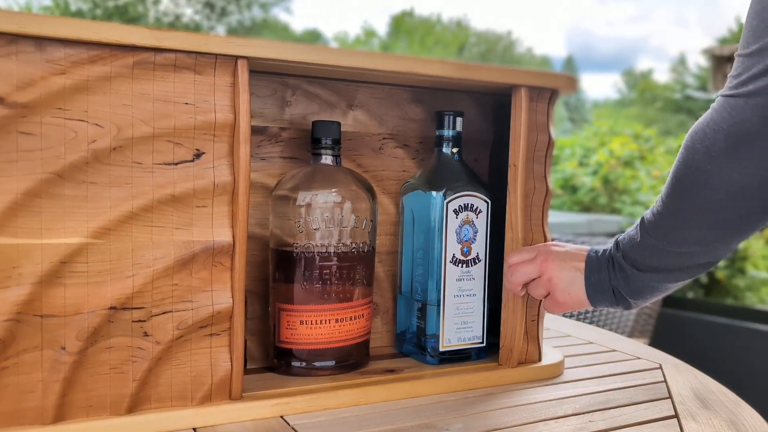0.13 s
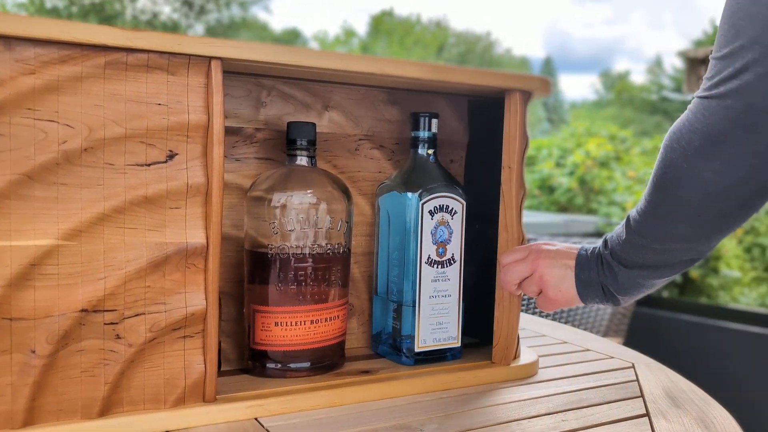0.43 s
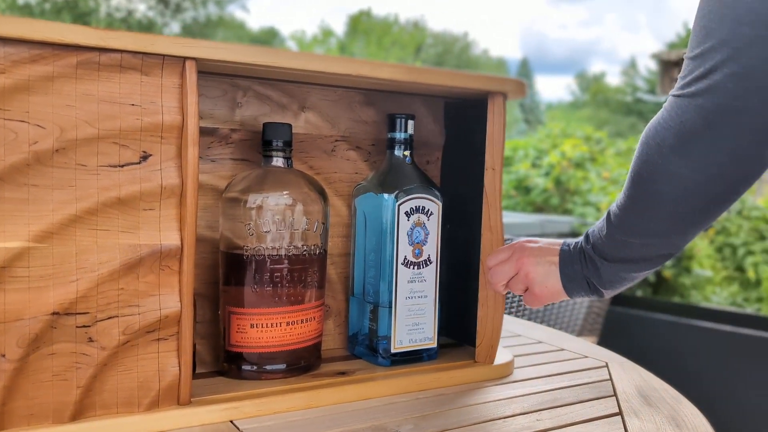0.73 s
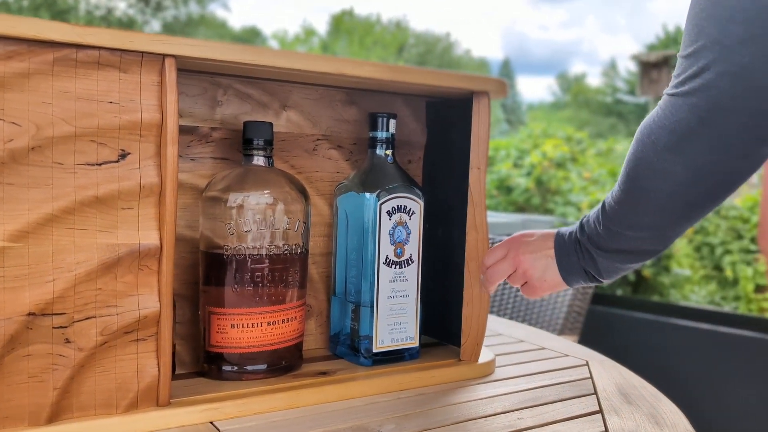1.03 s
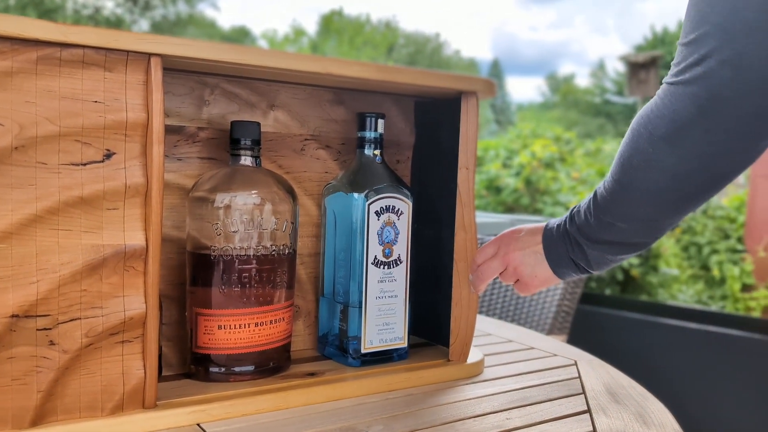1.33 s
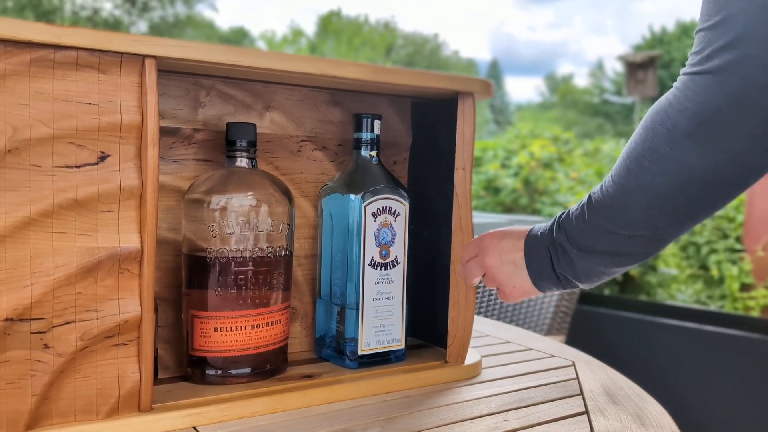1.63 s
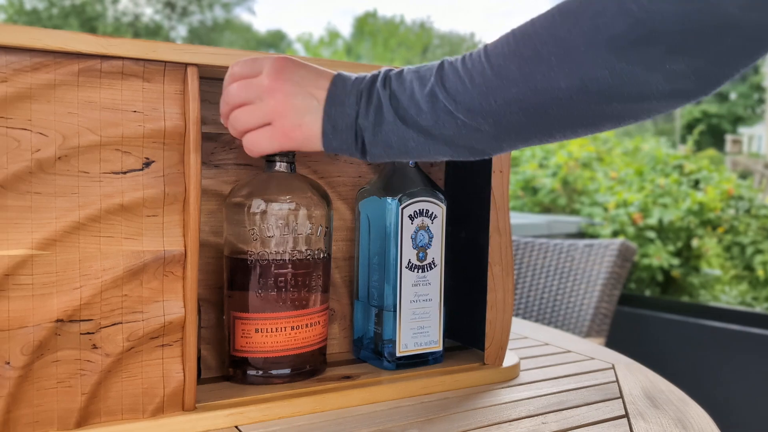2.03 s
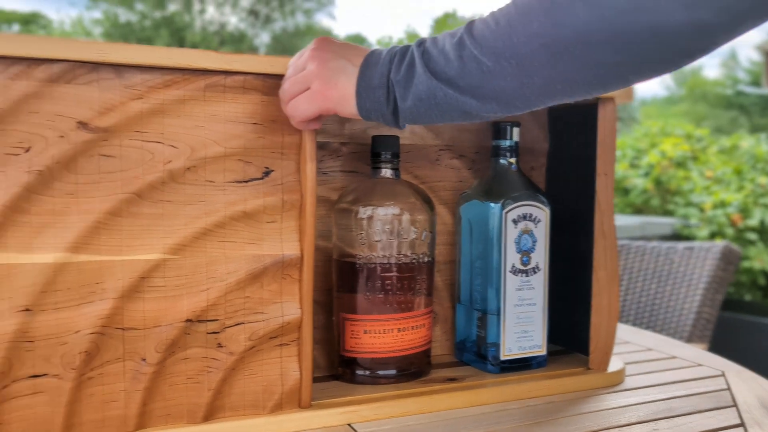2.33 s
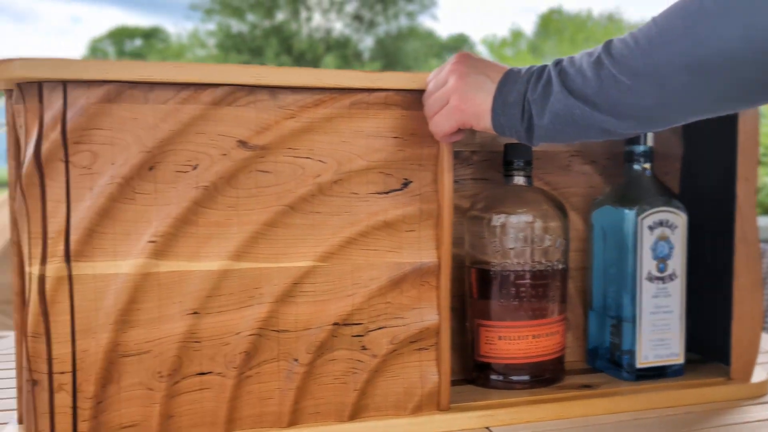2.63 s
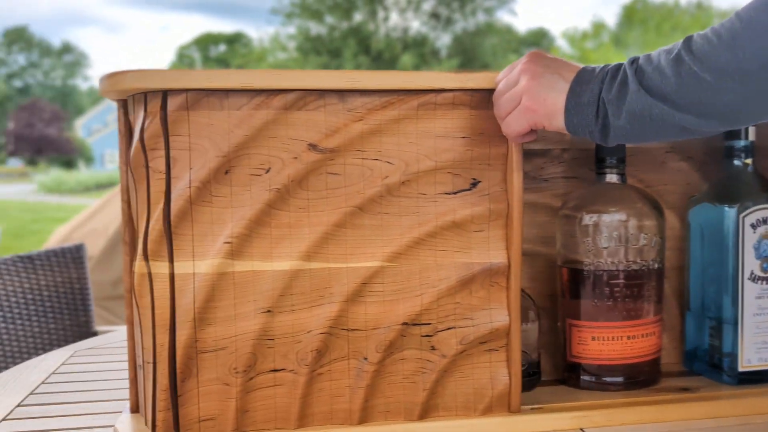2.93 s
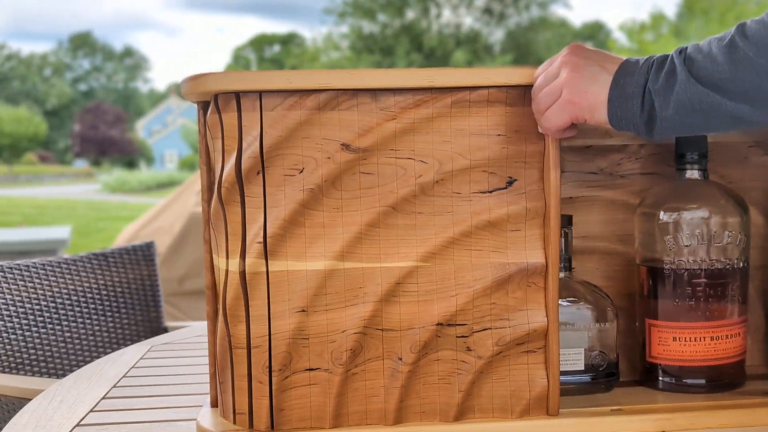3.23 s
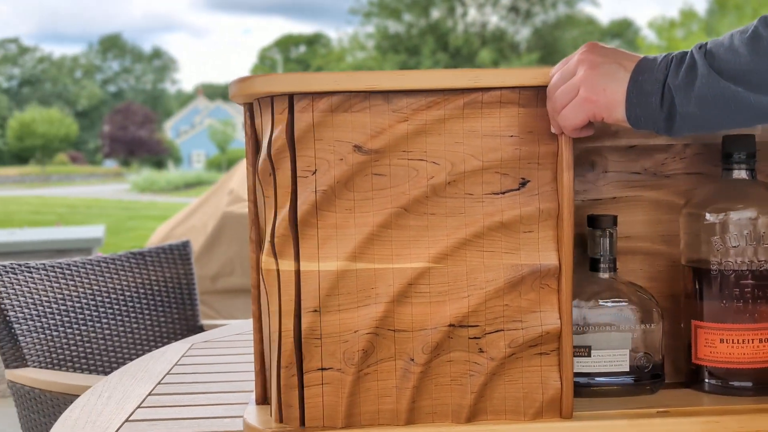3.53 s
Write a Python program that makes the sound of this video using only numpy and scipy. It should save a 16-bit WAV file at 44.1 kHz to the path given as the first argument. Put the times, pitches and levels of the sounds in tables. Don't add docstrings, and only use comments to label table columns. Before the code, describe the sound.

A slatted wooden door slides close by from 0 to 0.6 s, with low hollow rumble, dry rubbing and small knocks, then a short shove until about 1.1 s. A quiet gap holds faint scuffs, distant bird whistles and a pulsing trill over soft air and traffic hum. From 2.8 s a second slide rolls louder, with deep woody thuds and quick clatter, still moving at the 3.7 s end.

```python
import sys
import numpy as np
from scipy import signal
from scipy.fft import rfft, irfft, next_fast_len
from scipy.io import wavfile
from scipy.ndimage import uniform_filter1d, map_coordinates

SR = 44100
rng = np.random.default_rng(int(sys.argv[2]) if len(sys.argv) > 2 else 0)


def invert_db(level):
    return 10 ** (np.asarray(level, dtype=float) / 20)


def inscribe(sig):
    pcm = np.round(np.clip(np.atleast_2d(sig).T, -1, 1) * 32767)
    wavfile.write(sys.argv[1], SR, pcm.astype(np.int16))


N = 161847


def unit(x):
    return x / np.sqrt(np.mean(x ** 2))


def shape(x, points):
    p, size = np.array(points), next_fast_len(N + SR)
    log_hz = np.log(np.fft.rfftfreq(size, 1 / SR) + 1)
    gain = invert_db(np.interp(log_hz, np.log(np.maximum(p[:, 0], 1)), p[:, 1]))
    return irfft(rfft(x, size) * gain, size)[..., :N]


def band(x, hz, width_hz):
    return signal.lfilter(*signal.iirpeak(hz, hz / width_hz, SR), x)


def low_cut(x, order, hz):
    return signal.sosfilt(signal.butter(order, hz, "high", fs=SR, output="sos"), x)


def ring(x, modes):
    out = 0
    for hz, db, t60_s in modes:
        pole = np.exp(2j * np.pi * hz / SR - np.log(1000) / (t60_s * SR))
        out = out + invert_db(db) * signal.lfilter([1], [1, -pole], x).imag
    return out


def walk(rate_hz):
    k = int(SR / rate_hz)
    steps = np.repeat(rng.standard_normal(N // k + 1), k)
    return 1.1 * uniform_filter1d(uniform_filter1d(steps, k), k)[:N]


def clicks(rate_hz, spread_db):
    chance, side, size = rng.random((3, N))
    return (chance < rate_hz / SR) * np.sign(side - .5) * invert_db(-spread_db * np.log(1 - size))


def ports(x, lag):
    left = map_coordinates(x, [np.arange(N) - lag], order=1, mode="mirror")
    return np.array([left, x])


def echoes(x, wet_db, t60_s):
    t = np.arange(int(t60_s * SR)) / SR
    tail = rng.standard_normal((2, SR))[:, :len(t)] * invert_db(-60 * t / t60_s)
    tail = tail / np.sqrt((tail ** 2).sum(axis=1, keepdims=True))
    return invert_db(wet_db) * signal.fftconvolve(x[None], tail, axes=1)[:, :N]


# time_s, cabinet_load_db, rub_level_db (faster sliding rubs louder)
HAND_PUSHES = [
    [(0, -40.5, -64.5), (.03, -43.5, -71.5), (.1, -46.5, -71.5), (.16, -46.5, -71.5), (.32, -52, -72.5),
     (.41, -48.5, -69), (.5, -55, -73.5), (.55, -58, -79.5), (.6, -75, -102)],
    [(.62, -46, -96), (.7, -58.5, -79.5), (.785, -61, -80), (.8, -54.5, -75), (.86, -52, -73.5),
     (.9, -47, -71.5), (.913, -45, -80), (.95, -56.5, -83), (1.1, -80, -99)],
    [(2.79, -60.5, -84), (2.825, -46.5, -80.5), (2.9, -48, -75.5), (3.0, -39.5, -72), (3.08, -45.5, -74.5),
     (3.17, -37, -71.5), (3.31, -40.5, -70), (3.38, -41.5, -74.5)],
    [(3.38, -42, -71), (3.44, -35, -70), (3.46, -41.5, -72), (3.5, -34, -67.5), (3.53, -31, -72.5),
     (3.57, -47.5, -79), (3.61, -36.5, -74), (3.65, -36, -64.5), (3.67, -35, -64)],
]


def effort(column):
    t, gains = np.arange(N) / SR, []
    for push in HAND_PUSHES:
        p = np.array(push)
        gains.append(invert_db(np.interp(t, p[:, 0], p[:, column], left=-150, right=-150)))
    return np.max(gains, axis=0)


def rumble(on, body, level_db):
    jolts = signal.lfilter(*signal.butter(1, 600, fs=SR), clicks(500, 1.3)) * invert_db(2.22 * walk(25.04))
    return ring(jolts * effort(column=1) * on, body) * invert_db(level_db) / np.std(ring(jolts, body))


def rub(on, track, colour, level_db, squeak_db):
    grit = unit(clicks(2500, 2.2)) * .5 + rng.standard_normal((2, N))
    grit = grit * invert_db(1.5 * walk(14))
    squeak = sum(invert_db(db + 4 * walk(13)) * band(grit, hz, width_hz) for hz, width_hz, db in track)
    hiss = unit(shape(grit, colour)) + invert_db(squeak_db) * unit(squeak)
    speed = effort(column=2)
    sheen = signal.sosfiltfilt(signal.butter(2, 6550, "high", fs=SR, output="sos"), hiss)
    brisk_db, sheen_power = -73.5, 0.94
    hiss = hiss - sheen * (1 - np.minimum(speed / invert_db(brisk_db), 1) ** sheen_power)
    return hiss * speed * on * invert_db(level_db)


# time_s, peak_db, low_thud_db, sharp_tick_db
SLAT_KNOCKS = [(0.079, -52, 22.5, -17.5), (0.189, -48, 8, -8), (0.326, -44, -6, -7),
               (0.368, -47.5, 16, 0.5), (0.601, -45, 3, -20), (0.654, -49, -16, 0),
               (0.908, -40.5, -17, -13.5), (0.964, -55, -10.5, -5.5), (1.015, -51, -19, -29),
               (2.824, -57, 12, 1), (2.896, -42.5, 1, -7), (2.983, -44, -7, -9), (3.223, -28.5, -0.5, -21),
               (3.313, -43, -16, -16), (3.405, -47, 2, -14), (3.434, -39.5, -6, -3),
               (3.502, -34.5, -1, -7.5), (3.598, -45, 5, -4), (3.649, -39, -2, -1)]


def knocks(on, body):
    hit, thud, tick = np.zeros((3, N + 2000))
    t = np.arange(900) / SR
    contact_s, thump_s = .003, .0016
    push = t / contact_s * np.exp(1 - t / contact_s)
    thump = t / thump_s * np.exp(1 - t / thump_s) / 150
    snap = np.minimum(t / 0.00116, 1) * np.exp(-t / 0.0023) * (1 - t / t[-1])
    for s, db, low_db, tick_db in SLAT_KNOCKS:
        noise = rng.standard_normal(900)
        i = int(s * SR)
        hit[i:i + 900] += on[i] * invert_db(db - 5) * unit(noise * push) / 40
        thud[i:i + 900] += on[i] * invert_db(db + low_db + 4) * thump
        tick[i:i + 900] += on[i] * invert_db(db + tick_db - 4.5) * 0.88 * noise[::-1] * snap
    upper = [(hz * 1.01, db - body[5][1], 1.16 * t60_s) for hz, db, t60_s in body if hz > 300]
    lower = [(hz, db, 0.85 * t60_s) for hz, db, t60_s in body if hz < 300]
    crack = band(band(tick[:N], 1835, 2460), 1800, 4600)
    return ring(hit[:N], upper) + ring(thud[:N], lower), crack


def door(on, body, track, colour, rumble_db, rub_db, squeak_db):
    woody, crack = knocks(on, body)
    wood = low_cut(rumble(on, body, rumble_db) + woody, 2, 85)
    close = ports(wood + crack, lag=-5.5) + echoes(crack, 20.9, 0.053)
    return close + rub(on, track, colour, rub_db, squeak_db)


# pitch_hz, level_db, t60_s
FIRST_CABINET = [(115.4, -10.5, 0.19), (169, -6.5, 0.088), (227.6, 1, 0.087), (358, -2, 0.028),
                 (425, -3.5, 0.038), (534, -4, 0.0332), (604, -8, 0.053), (773, -5.5, 0.036),
                 (944, -5.5, 0.02), (1154, 0.5, 0.0098)]
SECOND_CABINET = [(96, -38.5, 0.087), (141.8, -2.5, 0.172), (211, 1, 0.059), (235, 0, 0.11),
                  (400, -15, 0.0922), (499, -7, 0.047), (542, -9, 0.088), (760.3, -15, 0.05),
                  (850, -19, 0.047), (966, -9.5, 0.017), (1368, -11.5, 0.011)]
# pitch_hz, width_hz, level_db
FIRST_TRACK = [(1690, 95, 4), (1950, 120, 1), (2250, 140, 0), (3130, 120, -4), (3320, 130, -4),
               (3600, 200, -10), (11800, 2000, -22)]
SECOND_TRACK = [(1710, 480, 11.5), (3500, 1340, -13), (11180, 1300, -7.5)]
# pitch_hz, level_db (per Hz)
FIRST_RUB = [(410, -29), (700, -8), (766, -4), (1470, -22.5), (3230, -10.5), (3970, -15.5), (12000, -23.5),
             (15500, -65.5)]
SECOND_RUB = [(410, -36), (700, -5), (797, -5.5), (1180, -7.5), (1630, -13), (2770, -19), (5640, -18.5),
              (15500, -43.5)]


def both_doors():
    second = np.arange(N) / SR > 2
    one = door(~second, FIRST_CABINET, FIRST_TRACK, FIRST_RUB, rumble_db=-0.71, rub_db=10.14, squeak_db=2.5)
    two = door(second, SECOND_CABINET, SECOND_TRACK, SECOND_RUB, rumble_db=-.7, rub_db=16.0, squeak_db=-11.5)
    return one + two


# start_s, pitch_hz, peak_db, t60_s
SLAT_TAPS = [(.019, 263, -36.5, .04), (.068, 190, -40, 0.046), (.097, 151, -37, .05),
             (.144, 842, -43.5, 0.03), (.167, 373, -35, .03), (.186, 219.4, -36, 0.034),
             (.213, 160, -44.5, .05), (.354, 200, -37, 0.045), (0.437, 130, -42, 0.097),
             (0.605, 1150, -51, .04), (.619, 248, -40, 0.054), (.655, 588, -46, 0.079),
             (.655, 400, -42, .05), (0.867, 231, -43.5, 0.12), (.914, 604, -42.5, 0.1),
             (.911, 380, -50, .05), (.964, 590.4, -53, 0.0345), (1.013, 416, -48, 0.054),
             (2.475, 250, -52, .06), (2.826, 236, -34.5, 0.047), (2.912, 3130, -44, 0.052),
             (2.984, 1080, -47, 0.031), (3.015, 822, -45.5, 0.076), (3.03, 1800, -53, 0.056),
             (3.065, 446, -50, 0.033), (3.173, 198, -27, 0.0613), (3.233, 147, -26, 0.054),
             (3.281, 167, -22, 0.048), (3.3, 150, -28, 0.052), (3.318, 1600, -43, .035),
             (3.33, 540, -44, .06), (3.416, 550, -45, 0.046), (3.427, 170, -24, 0.044),
             (3.434, 3600, -49, .04), (3.436, 543.3, -46, 0.089), (3.507, 215.7, -25.5, 0.034),
             (3.508, 553, -33.5, 0.064), (3.506, 2350, -43, .035), (3.61, 1723, -40, 0.03),
             (3.622, 218.5, -31, 0.073), (3.648, 974, -35.5, 0.036), (3.65, 1710, -42, .03),
             (3.655, 149, -39, .08)]


def taps():
    t, out = np.arange(N) / SR, np.zeros(N)
    for s, hz, db, t60_s in SLAT_TAPS:
        i = slice(int(s * SR), int((s + t60_s) * SR))
        u = t[i] - s
        rise = np.clip(u * hz, 0, 1)
        out[i] += invert_db(db - 60 * u / t60_s) * rise * np.sin(2 * np.pi * hz * u)
    bright = low_cut(out, 2, 700)
    rattle = bright * (.5 + .9 * walk(1500))
    return ports(out - bright + .5 * rattle, lag=-1) + echoes(rattle, -7, 0.021)


# start_s, length_s, pitch_hz,
# level_db
HISS_SWELLS = [(0.6535, 0.0069, 4770, -52), (0.653, 0.005, 10500, -61), (.87, .03, 14000, -81),
               (1.503, 0.16, 10000, -76.5), (.98, 0.33, 3500, -64), (1.42, 0.41, 3500, -60.5),
               (1.878, 0.014, 10000, -68.5), (2.115, 0.394, 10000, -73), (2.808, 0.12, 10700, -62),
               (3.479, 0.047, 11400, -52.5), (3.644, 0.038, 11000, -51)]


def scuffs():
    t, out = np.arange(N) / SR, 0
    for s, length_s, hz, db in HISS_SWELLS:
        u = np.clip((t - s) / length_s, 0, 1)
        swell = np.sin(np.pi * u ** 0.47) ** 2
        out = out + invert_db(db) * swell * band(rng.standard_normal((2, N)), hz, 0.36 * hz)
    return out


# start_s, length_s, start_hz, end_hz, level_db
WHISTLED_NOTES = [(1.2, 0.06, 7300, 7500, -80), (1.251, 0.15, 7620, 7520, -77),
                  (1.27, 0.11, 8140, 8100, -82), (1.412, 0.04, 4640, 4620, -64),
                  (1.468, 0.075, 4600, 4640, -65), (1.43, 0.11, 4200, 4250, -69),
                  (1.515, 0.11, 5130, 5130, -63), (1.515, 0.12, 4380, 4360, -65),
                  (2.012, 0.13, 4320, 4340, -65), (2.03, .1, 4620, 4600, -69),
                  (2.075, .045, 4200, 3800, -65), (2.105, .04, 3900, 3350, -65),
                  (2.152, .045, 3300, 3000, -68), (2.908, .018, 4200, 3600, -58)]


def whistles():
    t, out = np.arange(N) / SR, np.zeros(N)
    wobble, flutter = walk(900), invert_db(2.7 * walk(120))
    for s, length_s, hz0, hz1, db in WHISTLED_NOTES:
        i = slice(int(s * SR), int((s + length_s) * SR))
        u = (t[i] - s) / length_s
        hz = (hz0 + (hz1 - hz0) * u) * (1 + .019 * wobble[i])
        swell = np.abs(np.sin(np.pi * u)) ** 0.15
        out[i] += invert_db(db) * swell * np.sin(2 * np.pi * np.cumsum(hz) / SR)
    out = out * flutter
    return invert_db(-6.0) * ports(out, lag=-20.5) + echoes(out, -5.5, 0.11) + echoes(out, -0.66, t60_s=0.62)


# first_note_s, low_hz, high_hz
TRILL_PARTS = [
    (1.406, 5300, 6190),
    (1.82, 7340, 7914),
]
# time_s, low_part_db, high_part_db
TRILL_LOUDNESS = [(1.4, -80, -90), (1.8, -74, -86), (2.15, -69, -81), (2.37, -75, -84.5),
                  (2.48, -66, -76.5), (2.85, -64, -74), (3.67, -65.5, -72)]


def trill():
    t, out = np.arange(N) / SR, 0
    period_s, depth_db = .1192, 8.5
    times, *swells = np.array(TRILL_LOUDNESS).T
    for (s0, low_hz, high_hz), swell in zip(TRILL_PARTS, swells):
        chips = clicks(900, 1.8) + 0.28 * rng.standard_normal((2, N))
        register = signal.butter(3, [low_hz, high_hz], "band", fs=SR, output="sos")
        buzz = unit(signal.sosfilt(register, chips))
        phase = (t - s0) / period_s % 1
        throb_db = depth_db * (np.exp(-(phase - .3) ** 2 / 0.057) - 1)
        out = out + (t > s0) * buzz * invert_db(np.interp(t, times, swell) + throb_db + 2.0 * walk(7.84))
    return out


# time_s, level_db
LINGER_LOUDNESS = [(0, -65.5), (1.05, -75), (1.18, -77.5), (1.36, -82.5), (1.45, -74), (3.67, -70)]


def lingering_song():
    far = band(band(rng.standard_normal((2, N)), 4900, 2400), 4900, 2400)
    level_db = np.interp(np.arange(N) / SR, *np.array(LINGER_LOUDNESS).T)
    return unit(far) * invert_db(level_db + 0.67 * walk(6.4))


# pitch_hz, level_db
AIR_COLOUR = [(110, 1.5), (200, -7.5), (350, -16.5), (1000, -19), (2000, -23.5), (3700, -31.5),
              (4300, -38.5), (7000, -48.5), (15500, -51)]


def garden():
    hum_hz, width_hz = 62.2, 17.4
    hum = unit(band(band(rng.standard_normal(N), hum_hz, width_hz), hum_hz, 1.9 * width_hz))
    hum_side = invert_db(-19.5) * unit(band(rng.standard_normal(N), hum_hz, width_hz))
    swell_db = 1.44 * (np.arange(N) / SR - 1.2)
    mid, side = shape(rng.standard_normal((2, N)), AIR_COLOUR) * invert_db(swell_db + 0.3 * walk(5.3))
    mid = signal.lfilter(*signal.butter(2, 90, "high", fs=SR), mid)
    side = shape(side, [(100, -17), (400, -8.5), (1000, 1.0)])
    sign = np.array([[1], [-1]])
    return invert_db(-57.5) / np.std(mid) * (mid + sign * side) + invert_db(-48) * (hum + sign * hum_side)


def scene():
    close = both_doors() + taps() + scuffs()
    return close + whistles() + trill() + lingering_song() + garden()


def band_limit(x):
    return signal.sosfilt(signal.butter(12, 15800, fs=SR, output="sos"), x)


# pitch_hz, level_db
RIGHT_OVER_LEFT = [(60, 1.2), (1000, 2), (2500, 1.5), (5000, 5.5), (9000, 4.5)]


def record(dry):
    p = np.array(RIGHT_OVER_LEFT)
    x = np.array([shape(dry[0], p * [1, -.5]), shape(dry[1], p * [1, .5])])
    return band_limit(low_cut(x, 3, 44))


dry = scene()
out = record(dry)
inscribe(out)
```